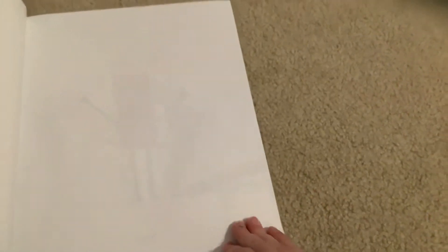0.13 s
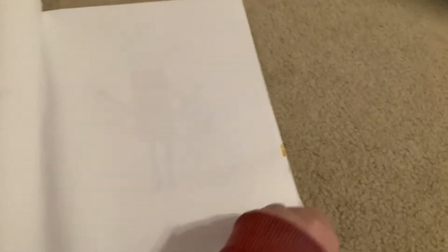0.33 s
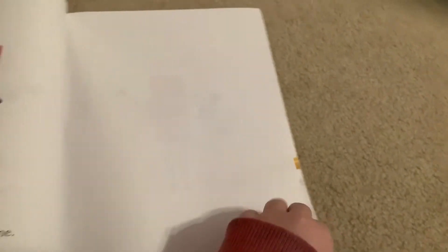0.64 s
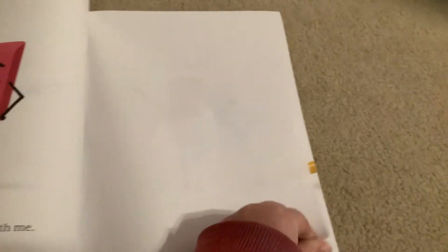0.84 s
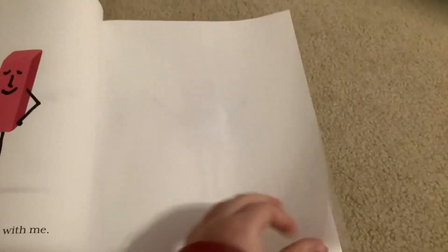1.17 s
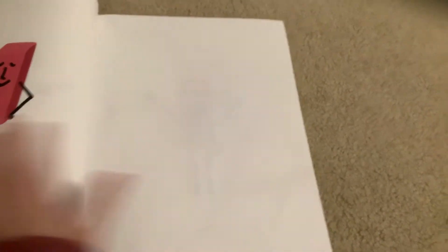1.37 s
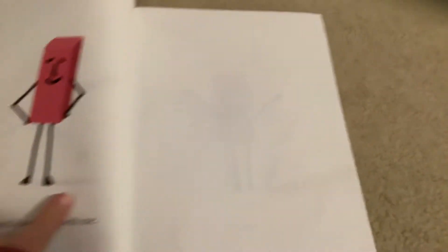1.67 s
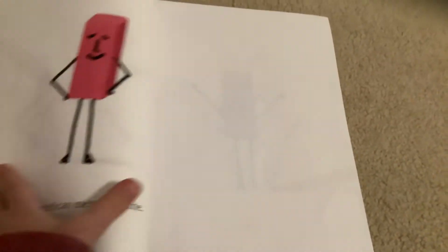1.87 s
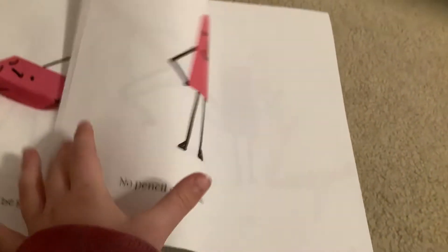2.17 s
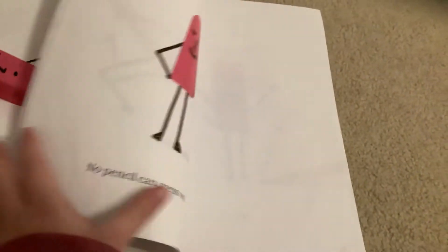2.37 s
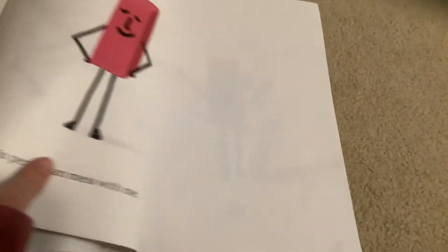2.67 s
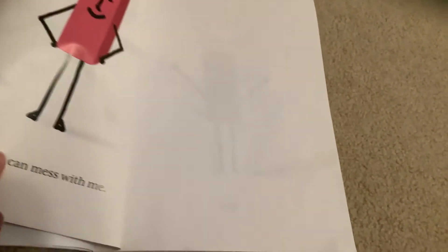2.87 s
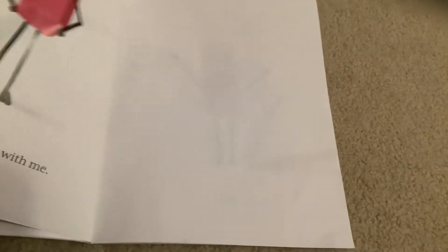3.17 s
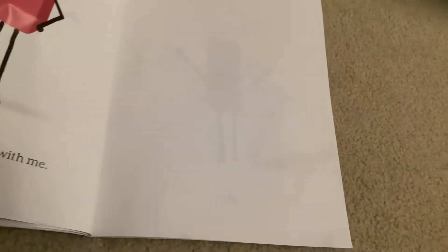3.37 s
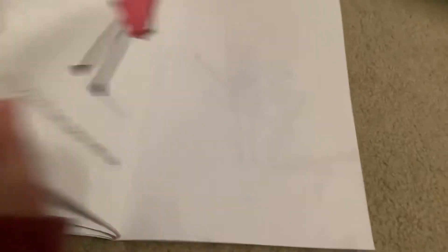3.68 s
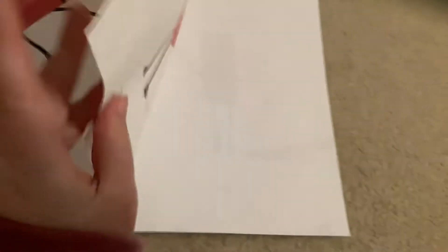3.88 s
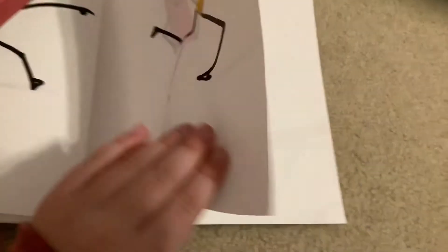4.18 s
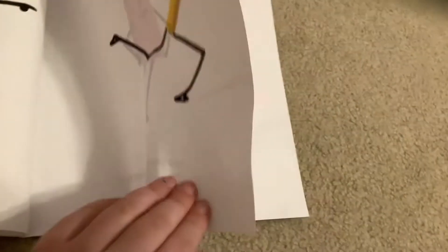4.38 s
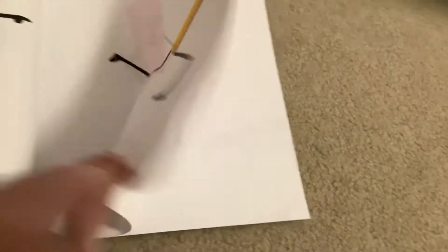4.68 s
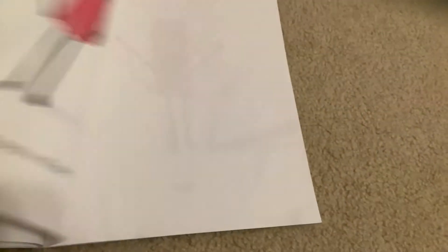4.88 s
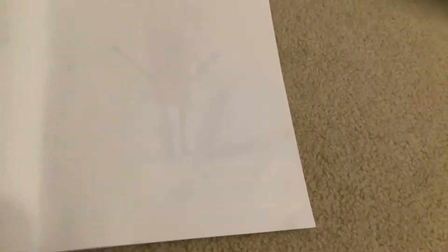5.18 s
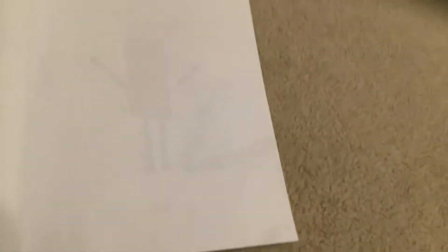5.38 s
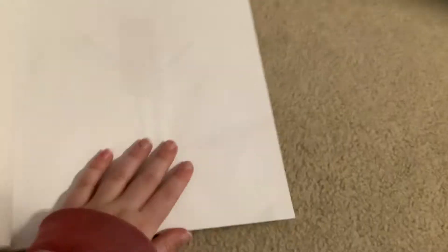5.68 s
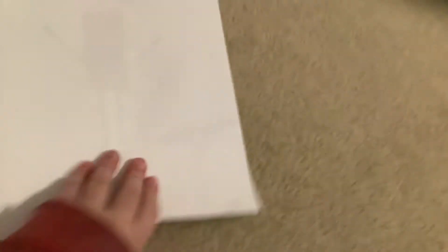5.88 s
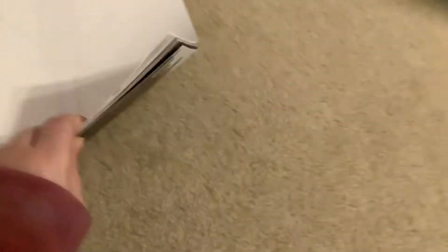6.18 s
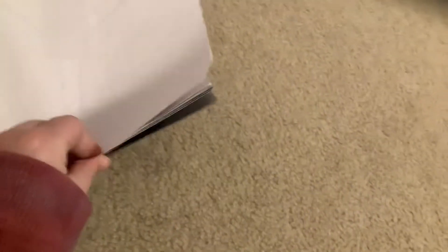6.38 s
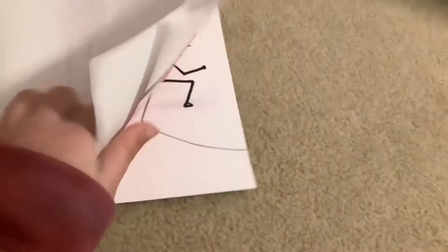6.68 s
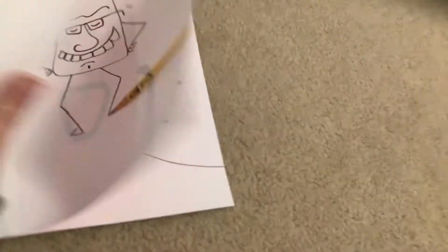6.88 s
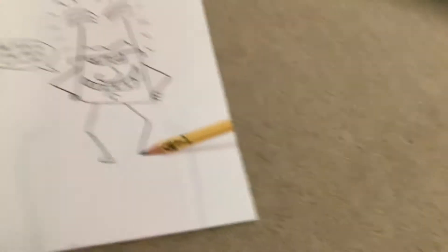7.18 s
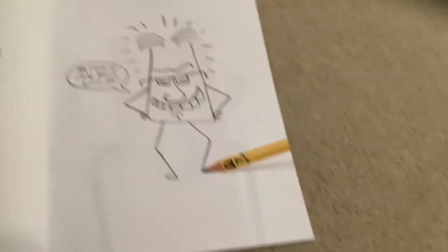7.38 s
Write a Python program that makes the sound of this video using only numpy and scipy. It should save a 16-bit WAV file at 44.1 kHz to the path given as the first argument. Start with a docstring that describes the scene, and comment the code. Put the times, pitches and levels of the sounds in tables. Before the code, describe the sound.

Large book pages slide, crackle and flap as a hand turns them close by, with crisp snaps, a thumb riffle and soft thuds.

```python
"""Turning the sheets of a big picture book

Large sheets are slid, lifted and turned by hand on a carpeted floor, close by, over a quiet steady floor noise.
Sliding is patchy hiss with small catches; bending is dense crackle, rustle and a low flap of moved air.
Buckles, edge ticks and a thumb riffle are noisy pushes into banks of resonances; knocks and pats are short noise.
Twice one sheet glides over another with a bright swish; a fingertip squeaks and creaks on a page at the start."""
import sys
import numpy as np
from scipy import signal
from scipy.io import wavfile
from scipy.ndimage import uniform_filter1d

SR = 44100
rng = np.random.default_rng(int(sys.argv[2]) if len(sys.argv) > 2 else 0)


def transcribe(u):
    """Save the signal u as a 16-bit wav file named by the first command-line argument.

    u: samples, shape (n,) or (channels, n), limited to [-1, 1]; the rate is SR.
    q: integer samples, one column per channel.
    """
    v = np.clip(np.atleast_2d(u).T, -1, 1)
    q = np.round(v * 32767).astype(np.int16)
    wavfile.write(sys.argv[1], SR, q)


N = 331632
TIME = np.arange(N) / SR
DITHER = 1e-18 * np.sin(np.arange(N))  # inaudible; keeps the filters quick through silence
SNAP_LEAD_S = .0108  # a snap starts this long before its peak

# A hand or sheet slides over paper; a light touch hisses brighter than a firm one.
# Each row: time of full speed in seconds, rise in seconds, fall in seconds, relative level in dB,
# tilt in dB (positive is brighter).
SLIDE_STROKES = [(.17, 0.17, 0.14, -53.5, 1.5), (.315, 0.047, 0.057, -44.5, -1.5),
                 (.6, 0.18, 0.21, -53, -1.5), (1.01, 0.04, 0.1, -57, -2.5),
                 (1.167, 0.012, 0.0093, -50.5, -3.5), (1.39, 0.026, 0.045, -50.5, 1),
                 (1.82, 0.25, 0.15, -51.5, -2.5), (2.05, 0.3, 0.13, -47.5, 4),
                 (2.36, 0.05, 0.041, -56.5, 0.5), (2.53, 0.031, 0.042, -50.5, -1.5),
                 (2.76, 0.28, 0.38, -59.5, -3.5), (2.99, 0.073, 0.14, -49.5, 1),
                 (3.24, 0.24, 0.13, -53.5, -2), (3.52, 0.12, 0.18, -54.5, -1),
                 (3.765, 0.019, 0.015, -41.5, 3), (4.04, .12, 0.13, -55.5, 0.5),
                 (4.21, 0.21, 0.13, -50.5, 7.5), (4.675, 0.078, 0.055, -45.5, 2.5),
                 (5.17, 0.075, 0.039, -53, -2), (5.33, 0.22, 0.19, -60.5, 2.5),
                 (5.66, 0.023, 0.027, -53.5, 5.5), (5.94, 0.16, 0.22, -58.5, -2),
                 (6.245, 0.029, 0.068, -51, -10.5), (6.38, 0.077, 0.091, -43, -5),
                 (6.505, 0.051, 0.042, -45, -4.5), (6.66, 0.094, 0.15, -48.5, -2.5),
                 (6.83, 0.057, 0.051, -45.5, -3.5), (7.25, 0.2, 0.28, -47.5, 3)]
# Each slide is a rounded arch: loss at the ends of its rise and fall, and how flat its top is.
SLIDE_END_DB, SLIDE_FLATNESS = -9.5, 1.83
SLIDE_REST_DB = -75  # between strokes the held book is never quite still


def from_db(db):
    """Decibels to gain."""
    return np.exp(np.asarray(db) * (np.log(10) / 20))


def rms_one(x):
    """Scale to unit power."""
    return x / np.sqrt(np.mean(x ** 2) + 1e-30)


def rms_10ms(x):
    """Scale so that the whole energy, packed into 10 ms, would have unit power."""
    return x / np.sqrt(np.sum(x ** 2) / (SR / 100))


def in_time(rows):
    """The columns of a curve at every sample."""
    s, *columns = np.transpose(rows)
    return [np.interp(TIME, s, c) for c in columns]


def at_hz(points, hz):
    """Read a table on a log-frequency axis."""
    f, value = np.transpose(points)
    return np.interp(np.log(hz), np.log(f), value)


def add(out, s, sound):
    """Mix a short sound in at time s."""
    start = max(int(s * SR), 0)
    out[start:start + len(sound)] += sound[:N - start]


def drift(rate):
    """Slow random wander with spread 1, smoothed above the rate in Hz and drawn every 40 samples."""
    r = np.exp(-80 * np.pi * rate / SR)
    white = rng.standard_normal(N // 40 + 2002)
    slow = signal.lfilter([1], [1, -2 * r, r * r], white)[2000:]  # past the settling of the filter
    return np.interp(np.arange(N) / 40, np.arange(len(slow)), rms_one(slow))


def band(x, low, high, order=2):
    """Causal band-pass."""
    sos = signal.butter(order, [low, min(high, .47 * SR)], "band", fs=SR, output="sos")
    return signal.sosfilt(sos, x + DITHER[:len(x)])


def bands(spectrum, count):
    """Neighbouring bands over the range of a spectrum: (low, high, centre)."""
    edges = np.geomspace(spectrum[0][0], spectrum[-1][0], count + 1)
    return zip(edges, edges[1:], np.sqrt(edges[1:] * edges[:-1]))


def noise(spectrum, patchy_db, patchy_rate, count):
    """Coloured noise whose bands swell, each at its own times."""
    white = rng.standard_normal((2, N))
    swell = from_db(patchy_db * drift(patchy_rate))
    out = 0
    for k, (low, high, hz) in enumerate(bands(spectrum, count)):
        own_swell = np.roll(swell, rng.integers(N))
        out = out + from_db(at_hz(spectrum, hz)) * band(white[k % 2], low, high) * own_swell
    return rms_one(out)


def resonate(x, hz, width):
    """One bending resonance, gain 1 on top."""
    r = np.exp(-np.pi * width / SR)
    feed = np.array([1, 0, -1]) * (1 - r * r) / 2
    return signal.lfilter(feed, [1, -2 * r * np.cos(2 * np.pi * hz / SR), r * r], x + DITHER[:len(x)])


def crackle(spectrum, per_s, size_db, q, count):
    """Tiny creases give way at random; each rings the sheet's resonances with strengths of its own."""
    at = np.flatnonzero(rng.random(N) < per_s / SR)
    sizes = from_db(size_db * np.minimum(rng.exponential(1, len(at)), 3))
    out, clicks = np.zeros(N), np.zeros(N)
    for low, high, hz in bands(spectrum, count):
        clicks[at] = from_db(at_hz(spectrum, hz)) * sizes * rng.standard_normal(len(at))
        out += band(resonate(clicks, hz, hz / q), hz / 2, hz * 2, order=1)
    # the hand feeds in energy steadily, however the creases share it: level over 50 ms
    return out / np.sqrt(uniform_filter1d(out ** 2, size=2200) + np.mean(out ** 2) / 10000)


def arches(rows, end_db, flatness):
    """Each stroke gathers speed, peaks and dies away: its power about every ms, one row per stroke."""
    t = TIME[::SR // 1000]
    s, rise_s, fall_s, level_db = np.transpose(rows)[:4, :, None]
    away = np.abs((t - s) / np.where(t < s, rise_s, fall_s))
    return t, from_db(level_db + np.maximum(end_db * away ** flatness, -200)) ** 2


def effort(rows, end_db, flatness, rest_db):
    """Level in dB of overlapping strokes above the stir of the resting book."""
    t, power = arches(rows, end_db, flatness)
    return np.interp(TIME, t, 10 * np.log10(power.sum(0) + from_db(rest_db) ** 2))


def quiet_floor():
    """Steady coloured noise under everything."""
    # Each row: frequency in Hz, relative level in dB per Hz.
    floor_colour = [(30, -25), (70, 13), (150, 9.5), (700, 1.5), (1400, -13.5), (4000, -18), (9700, -2.5),
                    (15500, -19.5)]
    return from_db(-66.5) * noise(floor_colour, patchy_db=0, patchy_rate=1, count=16)


def creak():
    """A fingertip sticks and slips, each slip knocking the page: first a rising squeak, then a slow creak."""
    # Each row: time in seconds, slips per second, level in dB before the gain of the page.
    creak_curve = [(.015, 335, -65.5), (.038, 435, -56.5), (.056, 450, -59), (.075, 590, -54),
                   (.084, 78, -61), (.128, 78, -49), (.2, 70, -59)]
    slips_per_s, level_db = in_time(creak_curve)
    turns = np.cumsum(slips_per_s + 8 * drift(60)) / SR
    slips = np.diff(np.floor(turns), prepend=0) / np.sqrt(slips_per_s)
    page = resonate(slips, 390, 120) - 0.45 * resonate(slips, 1140, 500) + 0.38 * resonate(slips, 1800, 250)
    return from_db(level_db) * rms_one(band(page, 280, 2100)) * (TIME < creak_curve[-1][0])


def touch():
    """Tilt of the hiss: an average over the slides of the moment, led by the strongest."""
    t, power = arches(SLIDE_STROKES, SLIDE_END_DB, SLIDE_FLATNESS)
    tilts_db = np.array(SLIDE_STROKES)[:, -1]
    return np.interp(TIME, t, tilts_db @ power / (power.sum(0) + from_db(SLIDE_REST_DB) ** 2))


def sliding():
    """Fibres rub past each other: a hiss with small catches, uneven as the grip comes and goes."""
    # Each row: frequency in Hz, relative level in dB per Hz.
    slide_colour = [(500, -12.5), (1500, -4), (3000, -0.5), (4400, -5), (5800, 0), (6500, -5), (9600, 1),
                    (11500, -3), (13000, -9.5), (15500, -21)]
    level_db = effort(SLIDE_STROKES, SLIDE_END_DB, SLIDE_FLATNESS, SLIDE_REST_DB)
    hiss = noise(slide_colour, patchy_db=2.1, patchy_rate=6, count=44)
    catches = crackle(slide_colour, per_s=400, size_db=1.5, q=5.4, count=22)
    rub = from_db(-2.5) * hiss + from_db(-9.0) * catches
    # the firmness of the touch tips the balance of the low and high halves
    tilt_db = touch()
    dull = signal.sosfiltfilt(signal.butter(2, 9300, fs=SR, output="sos"), rub)
    tilted = dull * from_db(-tilt_db) + (rub - dull) * from_db(tilt_db / 2)
    return from_db(level_db + 2.5 * drift(30)) * tilted


def bending():
    """A flexing sheet: the harder it bends the denser its creases, over fine rustle and the flap of moved air."""
    # A sheet is flexed and let go.
    # Each row: time of the tightest bend in seconds, rise in seconds, fall in seconds, relative level in dB.
    bend_strokes = [(.22, .16, 0.13, -60), (.37, 0.069, 0.063, -49), (.56, 0.082, 0.19, -54),
                    (1.09, 0.03, 0.029, -54), (1.509, 0.01, 0.02, -50.5), (1.79, 0.2, 0.26, -59),
                    (2.315, 0.08, 0.069, -57.5), (2.505, .025, 0.026, -54.5), (2.71, 0.038, 0.21, -57.5),
                    (2.99, 0.068, 0.25, -56), (3.272, 0.051, 0.033, -47), (3.61, 0.075, 0.059, -56),
                    (3.83, .09, 0.099, -46), (3.99, 0.085, 0.39, -58), (4.675, 0.092, .11, -44),
                    (4.91, .025, 0.07, -47.5), (5.19, 0.067, 0.0943, -50), (5.98, 0.18, 0.28, -62),
                    (6.33, 0.12, 0.18, -46.5), (6.61, 0.14, 0.11, -46), (6.83, 0.062, 0.075, -43),
                    (6.905, 0.062, .115, -40), (7.24, 0.13, 0.1, -53)]
    # Colours of the creases and of the moved air. Each row: frequency in Hz, relative level in dB per Hz.
    bend_colour = [(200, -17), (380, 2), (1300, 4), (2000, -1), (2800, -2), (3600, -22.5), (5000, -16),
                   (8000, -32), (16000, -54.5)]
    flap_colour = [(25, -36), (50, -6), (75, -0.5), (160, 0), (400, -5)]
    level_db = effort(bend_strokes, end_db=-12, flatness=2.1, rest_db=-83)
    creases_per_s = 420 * from_db(.4 * (level_db + 50))
    creases = crackle(bend_colour, creases_per_s, size_db=5, q=9.3, count=24)
    rustle = noise(bend_colour, patchy_db=2.0, patchy_rate=6.4, count=24)
    flap = noise(flap_colour, patchy_db=3.5, patchy_rate=12.8, count=8)
    # the sheet gives way in fits and starts
    fits = from_db(level_db + 1.5 * drift(35))
    flexing = fits * (from_db(-1.0) * creases + from_db(-7.0) * rustle)
    return flexing + from_db(0.72 * level_db - 19.5) * flap


def snap(levels_db, tilt_db, crumple_ms, q=7.7, crumple=1.0, lag_ms=0.74, damping_hz=50):
    """A main buckle within a short run of small ones rings the sheet; slow bending waves bring the lows late."""
    # Each row: frequency in Hz, relative strength of the ring in dB.
    snap_colour = [(120, -1), (800, 1.5), (2000, -1), (2900, -1.5), (4200, -11.5), (5700, -0.5),
                   (6800, -12), (9800, -6), (16000, -45)]
    t = np.arange(SR // 12) / SR - .01
    # the run builds up three times as fast as it dies away
    fade = np.exp(-np.where(t < 0, -t * 3, t) / (crumple_ms / 1000))
    run = rng.standard_normal(len(t)) ** 3 * fade
    push = crumple * np.sqrt(crumple_ms) * run / np.linalg.norm(run)
    push[np.argmin(abs(t))] += 1
    out, edges = 0, [120, 900, 4500, 13500]  # Hz, around the body, the crack and the edge
    for low, high, level_db in zip(edges, edges[1:], levels_db):
        places = (np.arange(10) + .5 + (rng.random(10) - .5) / 2) / 10
        rings = 0
        for k, hz in enumerate(low * (high / low) ** places):
            octaves = np.log2(np.clip(hz, edges[1], edges[2]) / low)
            gain = from_db(at_hz(snap_colour, hz) + tilt_db * octaves + rng.standard_normal())
            lag = int(SR * lag_ms / 1000 * np.sqrt(500 / hz))  # lag_ms holds at 500 Hz
            rings = rings + np.roll(resonate(push, hz, hz / q + damping_hz), lag) * gain * (-1) ** k
        out = out + from_db(level_db) * rms_10ms(band(rings, low, high))
    return out


def ticks(body_db=-7, tilt_db=1, crumple_ms=2.1):
    """A page edge catches and lets go with a thin bright tick that has little body."""
    # Each row: time in seconds, level in dB of crack and edge alike, over 10 ms.
    edge_ticks = [(.299, -46), (.324, -43.5), (.913, -66.5), (.934, -61.5), (1.012, -47), (1.059, -55),
                  (1.094, -58), (1.169, -59), (3.605, -51.5), (4.152, -54.5), (4.49, -52.5), (5.903, -50),
                  (6.35, -45), (6.5, -42.5), (6.804, -52), (7.019, -54.5)]
    out = np.zeros(N)
    for s, level_db in edge_ticks:
        add(out, s - SNAP_LEAD_S, snap((level_db + body_db, level_db, level_db), tilt_db, crumple_ms))
    return out


def snaps():
    """The sheet buckles or its edge flicks: a low body, a crack and a bright edge."""
    # Each row: time in seconds, crack in dB, edge in dB (both over 10 ms, before a common gain),
    # tilt of the crack in dB per octave, length of the crumple in ms.
    buckles = [(0.347, -33.5, -34.5, -2.5, 0.97), (0.363, -42, -46, 6, 2.6), (0.384, -40.5, -54, 4.5, 4.4),
               (0.497, -43, -47, 0.5, 2.5), (0.551, -45, -46, -2.5, 4), (0.712, -47, -48, 2, 6.3),
               (1.079, -44, -53.5, 4.5, 3.3), (1.4983, -53, -53.5, 1, 1.9), (2.677, -34, -58, -1, 1.9),
               (2.686, -28.5, -40, 5.5, 1.55), (2.807, -46, -54, -1, 6.1), (3.2599, -37.5, -50, 10, 3.1),
               (3.274, -43, -52, 1.5, 5.2), (3.758, -46, -51, 3, 5.5), (3.823, -47, -70, 6, 3.8),
               (4.0654, -37, -48, 8, 1.36), (4.121, -49, -59, 19, 0.37), (4.386, -48, -52, -1, 5.3),
               (4.478, -51, -55, -1.5, 2.9), (4.54, -49.5, -52, -2, 3.5), (4.742, -42, -52, 1, 5.8),
               (4.884, -24.5, -42.5, 2, 2.67), (4.905, -37.5, -43.5, 0, 4.2), (5.1593, -40, -64, 3, 6.4),
               (5.188, -48, -46.5, 4, 3.3), (6.318, -40, -68, 0, 1.64), (6.368, -32.5, -40.5, 5, 4.9),
               (6.47, -33.5, -48, 2, 6.7), (6.591, -31, -38.5, 1, 5.8), (6.601, -42, -54, 3, 1.93),
               (6.79, -43, -48.5, -1, 2.04), (6.877, -42, -58, 4, 2.52), (6.9026, -21, -29, 5.5, 12.5),
               (6.928, -36, -61, 6, 9.7), (7.064, -43, -68, 1, 6.3), (7.4261, -39.5, -56, 6, 1.46),
               (7.436, -42.5, -56, 0, 2.7)]
    out = np.zeros(N)
    for s, crack_db, edge_db, tilt_db, crumple_ms in buckles:
        # the body grows more slowly than the crack, and a crisp snap has less of it
        body_db = -48 + 0.6 * (crack_db + 45) - 1.44 * tilt_db
        add(out, s - SNAP_LEAD_S, snap((body_db, crack_db, edge_db), tilt_db, crumple_ms))
    return from_db(1.5) * out


def pats(low_hz=88, high_hz=300, fade_s=0.018):
    """A hand or sheet lands softly: a dying thud in the stack of pages, damped by the carpet."""
    # Each row: time in seconds, relative level in dB.
    landings = [(0.514, -53), (1.406, -56.5), (2.229, -54.5), (3.959, -55), (4.7, -45.5), (5.846, -54),
                (6.624, -44.5), (6.919, -40.5), (7.226, -48)]
    out, t = np.zeros(N), np.arange(SR // 10) / SR
    for s, level_db in landings:
        thud = band(rng.standard_normal(len(t)) * np.exp(-t / fade_s), low_hz, high_hz)
        add(out, s, from_db(level_db - 4.5) * rms_one(thud))
    return out


def swishes(end_db=-26.0, width_hz=3300, top_ratio=1.27):
    """Sheets glide face to face, faster then slower: a sharp-edged bright band, thin rasp and grainy low scrape."""
    # Each row: time of full speed in seconds, half length in seconds, centre of the hiss in Hz,
    # hiss in dB, rasp in dB, scrape in dB.
    glides = [(0.606, 0.17, 8500, -37, -55.5, -51), (7.254, 0.16, 9000, -38.5, -50, -47.5)]
    white, flicker = rng.standard_normal(N), from_db(.8 * drift(90))
    rasp = rms_one(band(white, 4500, 6450, order=8))
    scrape_colour = [(320, -1), (540, 5.0), (950, -5.5), (2000, -15)]  # Hz, relative dB
    scrape = crackle(scrape_colour, per_s=700, size_db=5.5, q=4.2, count=8)
    out = 0
    for s, half_s, hz, hiss_db, rasp_db, scrape_db in glides:
        bright = band(white, 7250, hz * top_ratio, order=5)
        hiss = flicker * rms_one(resonate(bright, hz, width_hz))
        speed = from_db(np.maximum(end_db * np.abs((TIME - s) / half_s) ** 2.6, -200))
        out = out + speed * (from_db(hiss_db) * hiss + from_db(rasp_db) * rasp + from_db(scrape_db) * scrape)
    return out


def taps(contact_s=0.00141, q=2.9):
    """A fingertip or page corner knocks: a soft contact builds up, then dully rings the damped stack."""
    # Each row: time in seconds, level in dB over 10 ms, pitch in Hz.
    knocks = [(1.755, -45.5, 1170), (1.812, -52.5, 1090), (1.872, -51.5, 1196), (2.172, -52.5, 980),
              (2.204, -55.5, 800), (2.273, -54, 600), (2.333, -55, 989), (2.461, -53.5, 1060),
              (2.688, -33.5, 1200), (2.963, -50.5, 746), (2.977, -48, 802), (3.024, -50.5, 743),
              (3.233, -49, 1700), (3.999, -49, 1508), (4.34, -48, 1090), (4.378, -45, 697),
              (5.022, -50.5, 1403), (6.014, -52.5, 751), (6.082, -51, 539.6), (6.191, -45.5, 650),
              (6.267, -44.5, 697), (6.307, -42, 1300), (6.547, -40.5, 1401), (6.685, -42.5, 1370),
              (6.76, -43.5, 1499), (6.816, -40.5, 1399), (7.111, -47.5, 1497), (7.163, -44, 621),
              (7.218, -40, 1900), (7.236, -45, 901), (7.258, -43, 540), (7.284, -44, 550)]
    out, t = np.zeros(N), np.arange(SR // 20) / SR
    for s, level_db, hz in knocks:
        push = rng.standard_normal(len(t)) * t * np.exp(-t / contact_s)
        knock = band(resonate(push, hz, hz / q), hz / 2, 3700)
        add(out, s - contact_s, from_db(level_db) * rms_10ms(knock))
    return out


def sings(q=13):
    """Narrow ringing tones: a low one swelling as a sheet is rubbed, a brief high one within a snap."""
    # Each row: time of the peak in seconds, half length in seconds, pitch in Hz, level in dB.
    tones = [(3.03, 0.081, 2225, -56), (4.478, .006, 10700, -45)]
    white, out = rng.standard_normal(N), 0
    for s, half_s, hz, level_db in tones:
        swell = np.exp(-np.minimum(((TIME - s) / half_s) ** 2, 20))
        tone = resonate(resonate(white, hz, hz / q), hz, 2 * hz / q)
        out = out + from_db(level_db) * swell * rms_one(tone)
    return out


def riffle(tilt_db=-2, crumple_ms=1.53, count=9):
    """Page edges slip off the thumb one after another, faster and faster, no two alike."""
    out, s = np.zeros(N), 4.568
    flick_db = np.array((-44.5, -46.5, -48))  # body, crack and edge of a typical flick
    for k, place in enumerate(np.linspace(-1, 1, count)):
        early, strong = rng.standard_normal(2)
        levels_db = flick_db - 3 * min(place, 0) ** 2 + 1.655 * strong  # the first flicks tend to be weaker
        length_ms = crumple_ms * (1 + 2 * max(place, 0) ** 4)  # the last ones blur
        add(out, s - SNAP_LEAD_S - early * .0008, snap(levels_db, tilt_db, length_ms))
        s += .0165 * .93 ** k  # seconds, each gap shorter than the one before
    return out


def room(x, t60=0.16, gap_s=0.0044):
    """A small carpeted room: a faint diffuse tail after a short gap, shorter in the treble."""
    # Each row: frequency in Hz, relative strength of the reverberation in dB.
    room_colour = [(100, -14), (14000, -16.5)]
    t = np.arange(SR // 2) / SR
    tail = 0
    for low, high, hz in bands(room_colour, count=10):
        fade = from_db(-60 * t / t60 * (1 + hz / 20000)) * (t > gap_s)
        dying = rng.standard_normal(len(t)) * fade
        tail = tail + from_db(at_hz(room_colour, hz)) * band(dying / np.linalg.norm(dying), low, high)
    return signal.fftconvolve(x, tail)[:N]


def scene():
    """The paper, the room around it and a quiet steady floor."""
    strokes = sliding() + bending() + swishes()
    flicks = ticks() + snaps() + riffle()
    paper = strokes + flicks + creak() + pats() + taps() + sings()
    return (paper + room(paper) + quiet_floor())[None]


def record(dry):
    """The top is cut steeply above 15.9 kHz."""
    return signal.sosfilt(signal.ellip(10, .2, 70, 15900, fs=SR, output="sos"), dry)


dry = scene()
out = record(dry)
transcribe(out)
```